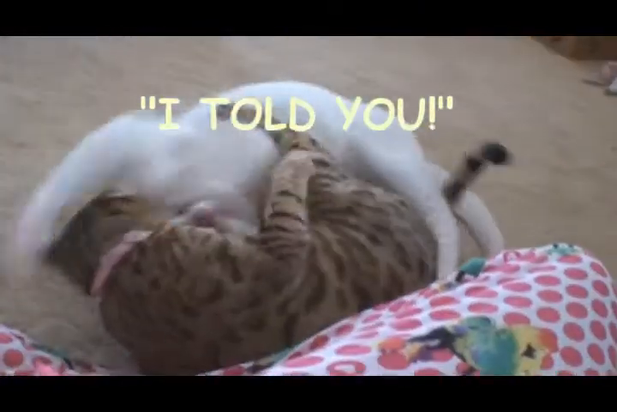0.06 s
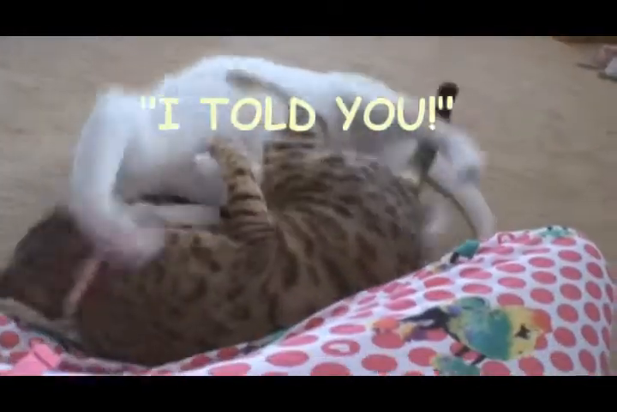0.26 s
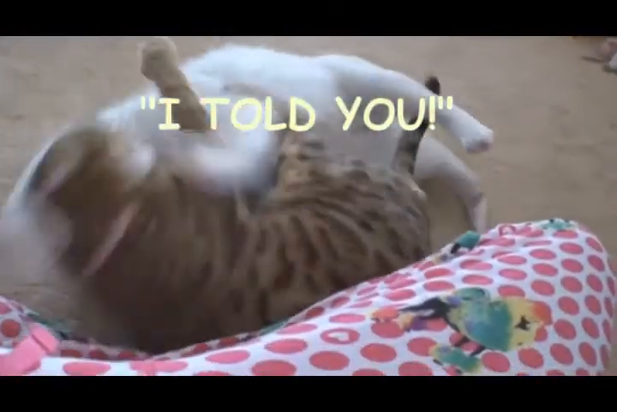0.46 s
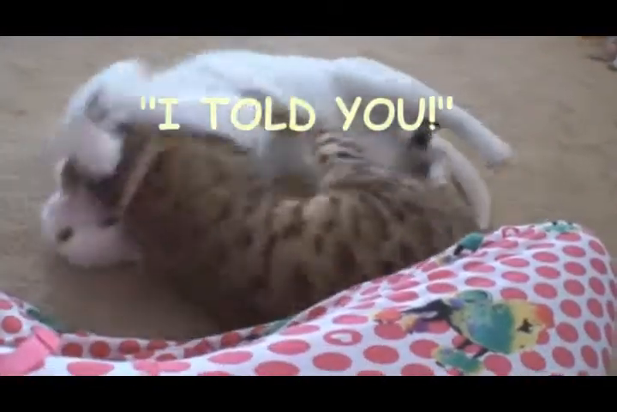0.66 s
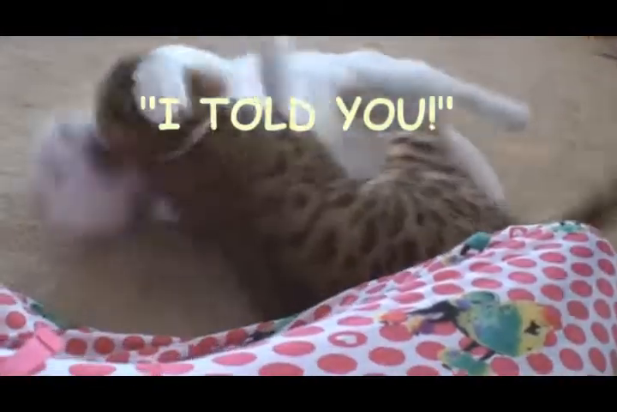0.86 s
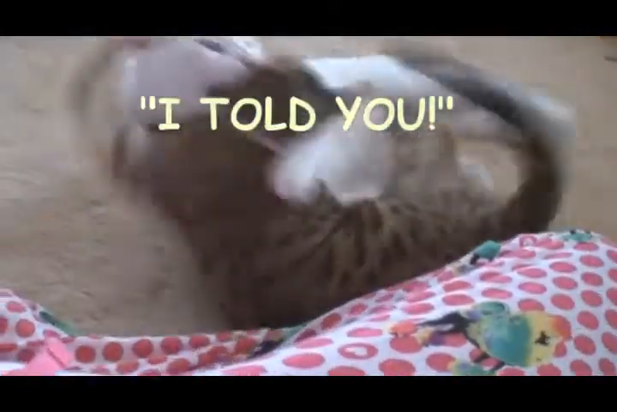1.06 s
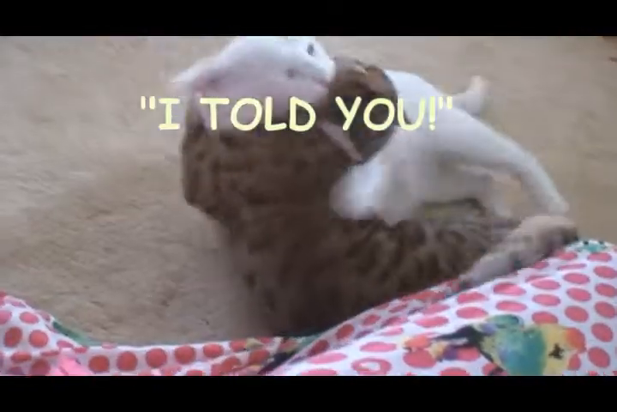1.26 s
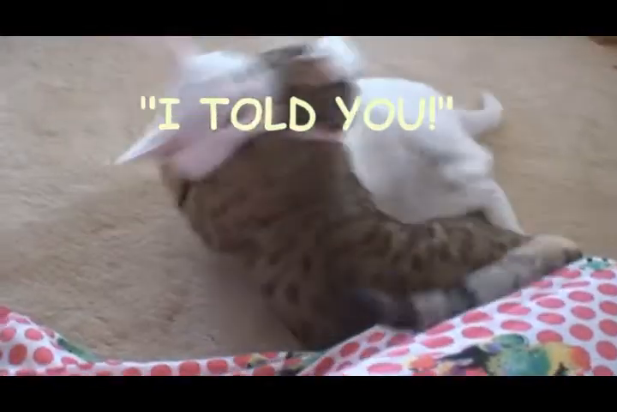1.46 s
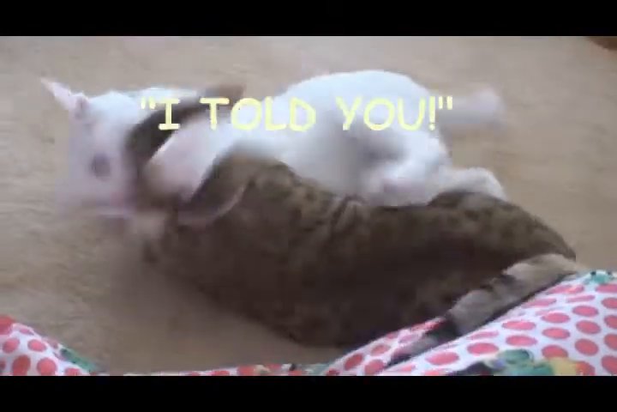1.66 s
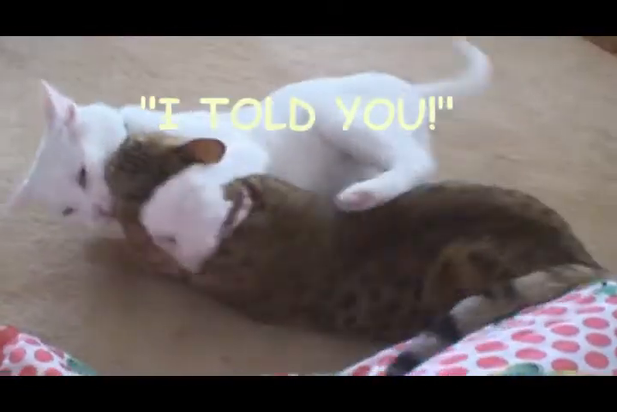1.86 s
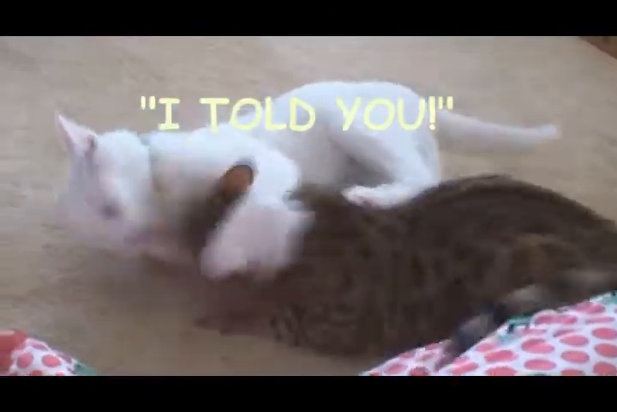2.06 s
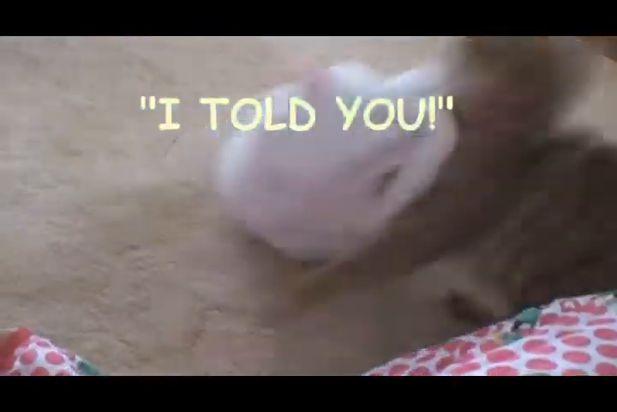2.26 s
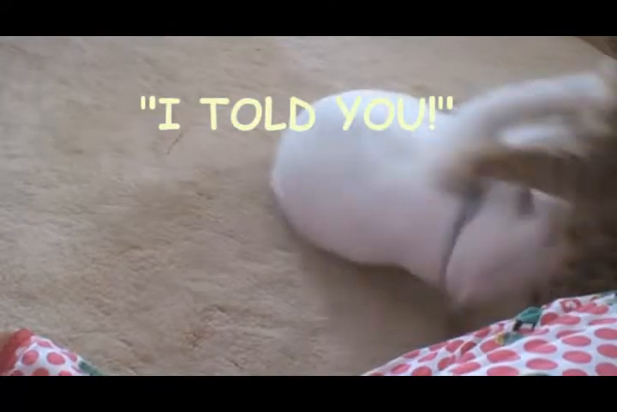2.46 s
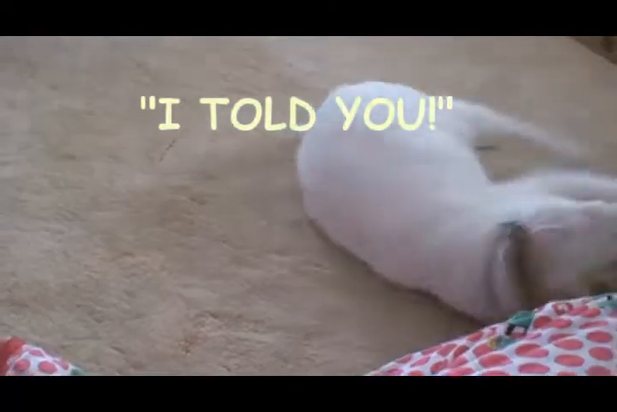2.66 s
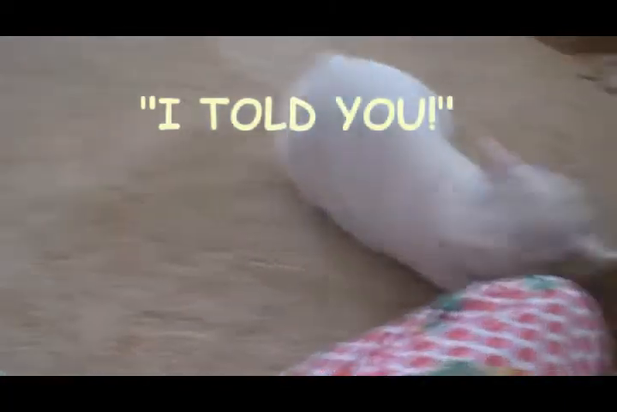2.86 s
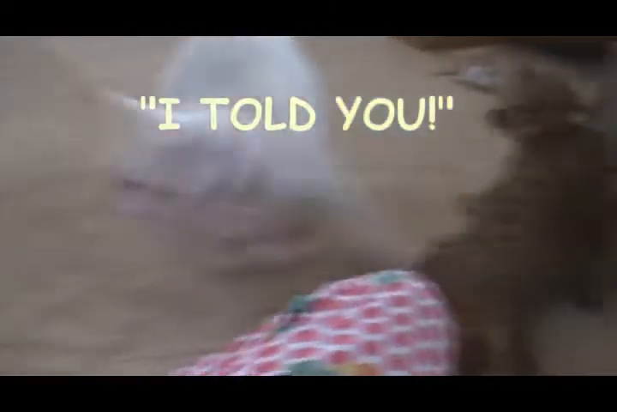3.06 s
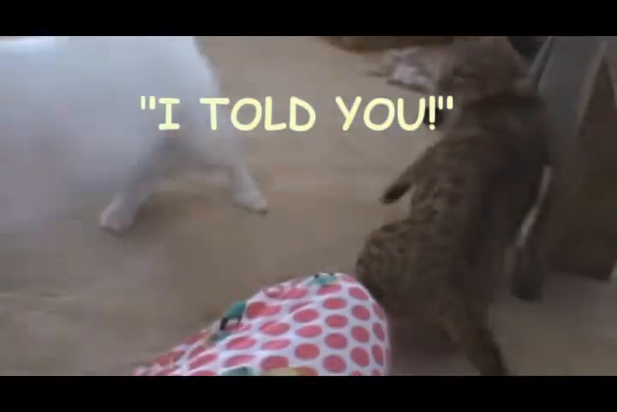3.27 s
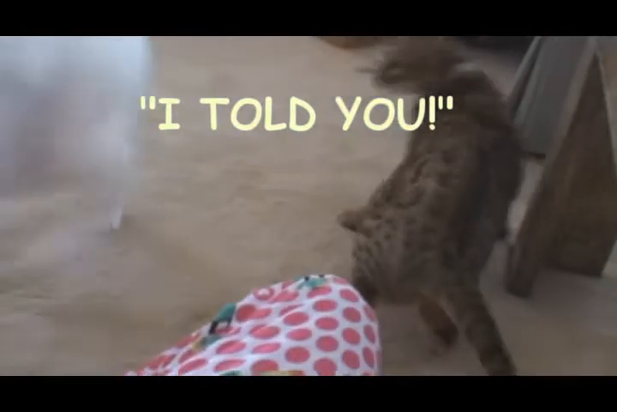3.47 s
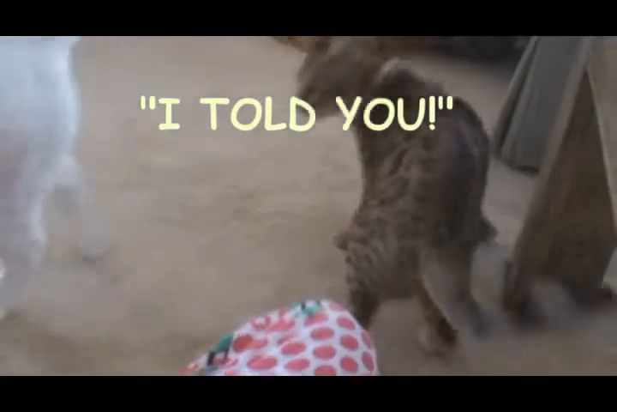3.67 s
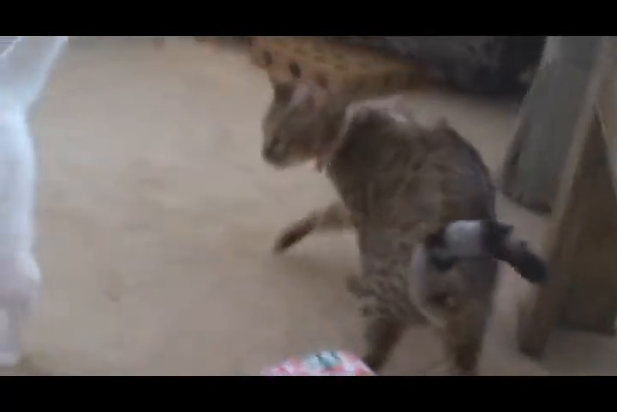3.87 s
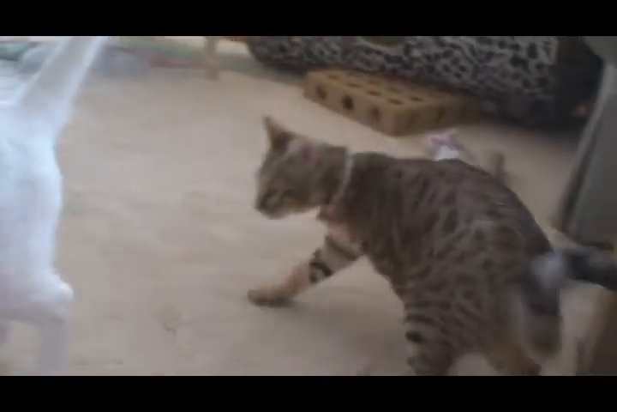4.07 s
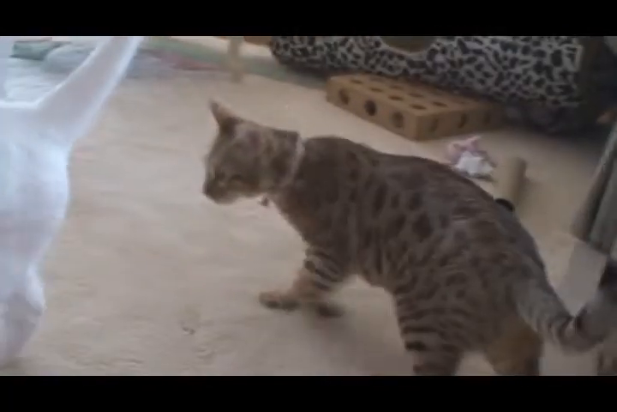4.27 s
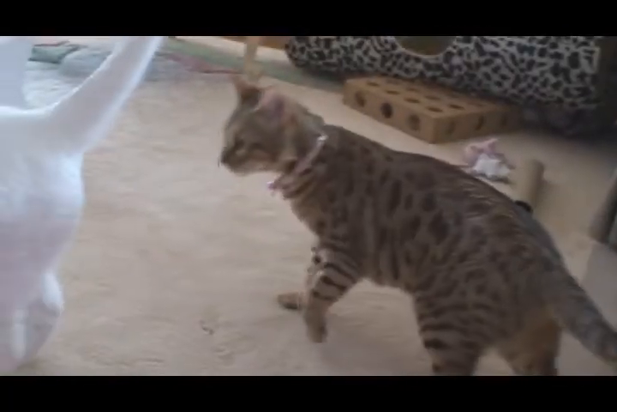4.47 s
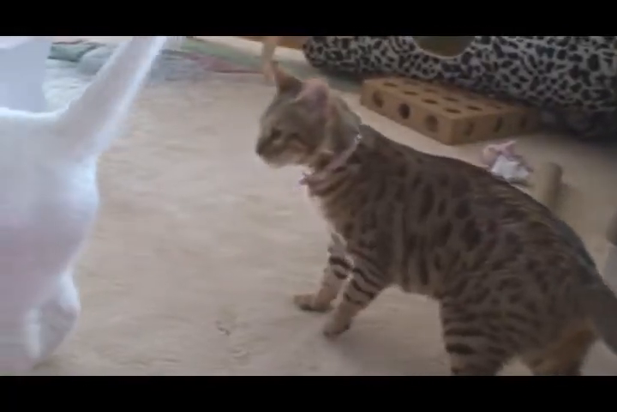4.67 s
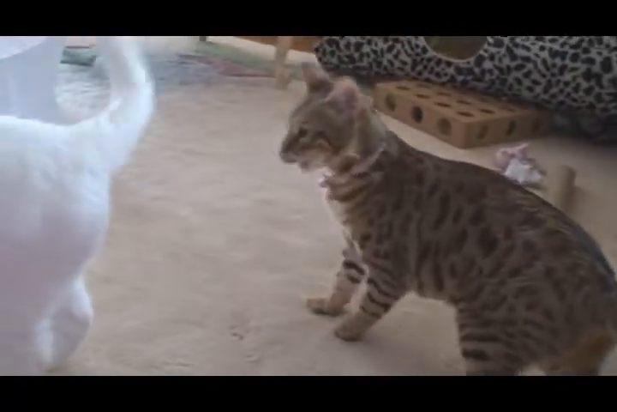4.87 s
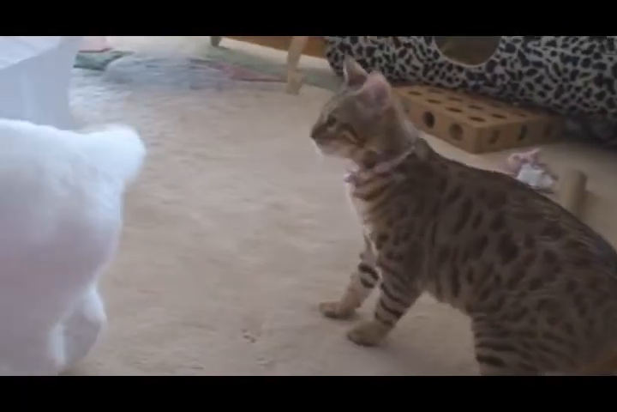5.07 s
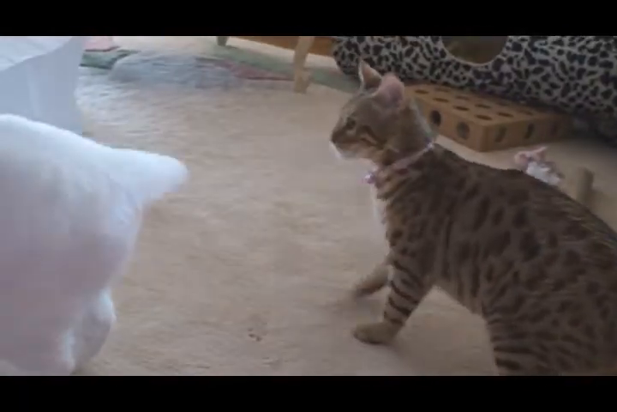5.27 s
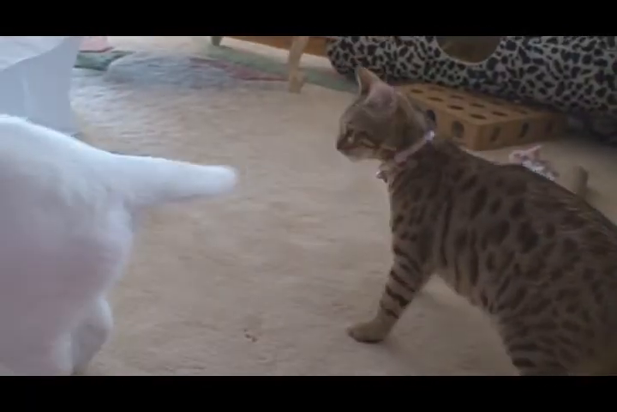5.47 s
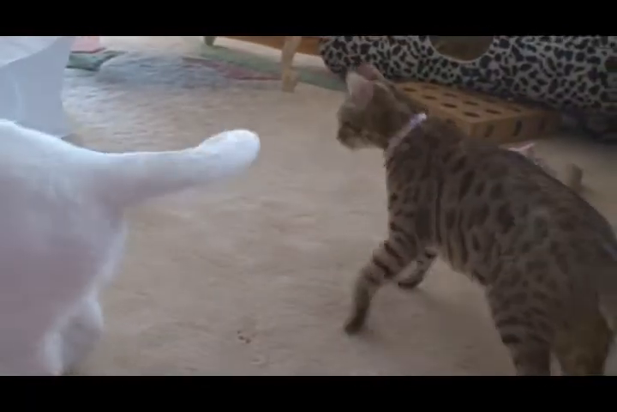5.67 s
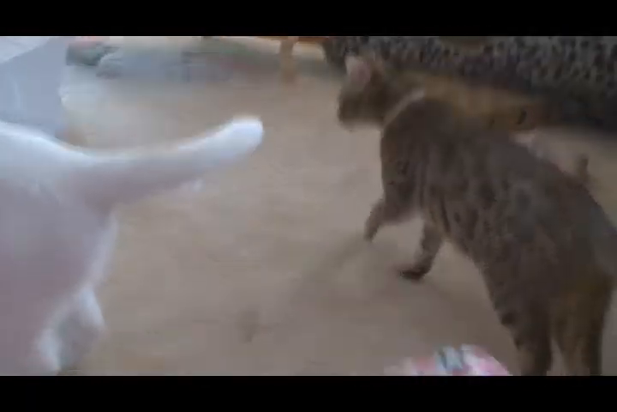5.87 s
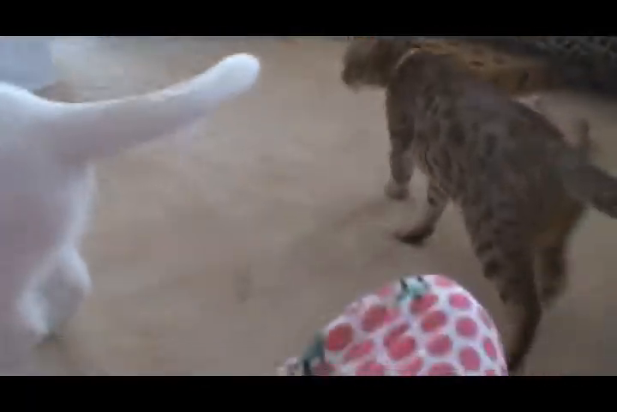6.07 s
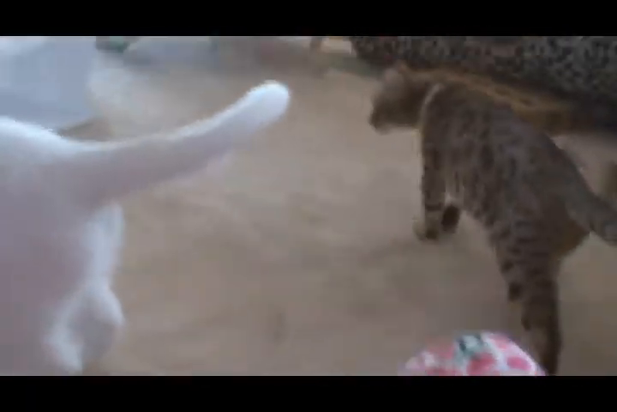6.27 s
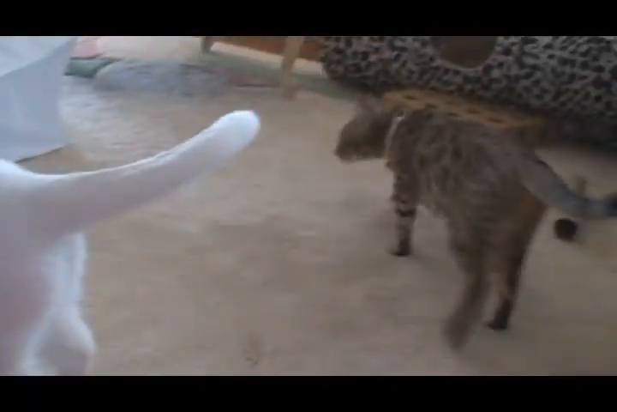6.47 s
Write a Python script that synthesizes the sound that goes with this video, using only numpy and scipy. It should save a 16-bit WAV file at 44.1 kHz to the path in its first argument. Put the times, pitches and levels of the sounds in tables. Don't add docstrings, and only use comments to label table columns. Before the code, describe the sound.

Indoors, close to a small camera, two cats wrestle on carpet. A tiny high metal bell gives faint muffled tinkles, with one sharp wooden knock early on. Mid-way it bursts into a loud, ragged jingle amid rustling fur and claw ticks, followed by a cluster of soft floor thumps. After a quiet gap with only a few dull clinks, one brief bright shake rings and dies. Hiss, low hum and thin motor tones continue underneath.

```python
import sys
import numpy as np
from scipy import signal
from scipy.fft import rfft, irfft, next_fast_len
from scipy.io import wavfile
from scipy.ndimage import uniform_filter1d

SR = 44100
rng = np.random.default_rng(int(sys.argv[2]) if len(sys.argv) > 2 else 0)


def master(y):
    cut = np.clip(np.atleast_2d(y).T, -1, 1)
    pcm = np.round(cut * 32767)
    wavfile.write(sys.argv[1], SR, pcm.astype(np.int16))


def volts_from_db(level):
    exponent = np.asarray(level, float) / 20
    return 10 ** exponent


N = 287046

# f/Hz, width/Hz, level/dB
MAIN_TONE = [(4832, 30, 0), (4890, 70, -15), (4750, 80, -18)]
# f/Hz, width/Hz, level/dB
SHELL_MODES = [(4845, 170, -5), (5150, 220, -8), (5500, 250, -9), (5940, 200, -11), (6350, 300, -23)]
# t/s, clack/dB, ring/dB, bright tick/dB, ring t60/s
FREE_BLOWS = [(0.19, -41, -41, -41.5, 0.1), (0.6005, -64, -36.5, -62, 0.23), (1.1383, -34, -57, -68, 0.41),
              (1.947, -21, -23, -49, 0.046), (2.0388, -39, -43, -74, 0.039), (2.4463, -39, -40, -56, 0.097),
              (2.4717, -15, -18, -61, 0.18), (2.5012, -14, -15.5, -68, 0.15),
              (2.612, -27, -42, -31.5, 0.19), (2.6259, -11.5, -24, -31, 0.28),
              (2.7483, -1, -19, -25.5, 0.13), (2.7781, -13, -25, -39, 0.14),
              (2.835, -17, -27.5, -38.5, 0.33), (3.2044, -17, -26.5, -54, 0.1),
              (3.3866, -15.5, -28.5, -31.5, 0.32), (3.4685, -18, -20.5, -46, 0.15),
              (5.3852, -34, -32, -55, 0.52), (5.4234, -32, -32.5, -60, 0.27), (5.472, -45, -30, -71, 0.07),
              (5.497, -14, -30, -41, 0.1), (5.5274, -4.5, -25, -33.5, 0.48), (5.5732, -13, -19.5, -49, 0.8),
              (5.685, -24, -47, -60, 0.072), (5.7204, -11.5, -20, -42.5, 0.036)]
# t/s, ring/dB, t60/s
SOFT_BLOWS = [(0.184, -43, .3), (0.4352, -41, .04), (2.758, -19, .04), (2.7745, -22, .04),
              (2.7877, -28, 0.045), (5.538, -24, 0.069), (5.594, -29, .05), (0.371, -45, .05),
              (0.385, -42, 0.065), (0.637, -48, .3), (0.661, -52, .3), (1.962, -36.5, 0.87),
              (2.003, -41.5, .8), (2.874, -36.5, 0.22), (2.964, -48, 0.18), (3.0502, -43, 0.13),
              (3.4647, -31, .2), (3.484, -43, .3), (5.562, -25, .5), (5.6032, -25.5, 0.11),
              (5.6451, -29, 0.078), (5.7395, -37, 0.036), (5.8013, -40, 0.072), (5.845, -38, 0.26),
              (5.868, -38, 0.1)]
GRAB_S = 0.002


def evened(x):
    return x / np.sqrt(np.mean(x ** 2) + 1e-20)


def read(points, hz):
    f, value = np.transpose(points)
    return np.interp(np.log(hz + 1), np.log(f + 1), value)


def add(mix, s, sound, pan_db):
    left = volts_from_db(pan_db)
    gains = [2 * left / (1 + left), 2 / (1 + left)]
    part = mix[:, round(s * SR):][:, :len(sound)]
    part += np.outer(gains, sound)[:, :part.shape[1]]


def resonate(x, hz, width):
    turn = np.exp(2j * np.pi * np.cumsum(hz * np.ones(len(x))) / SR)
    r = np.exp(-np.pi * width / SR)
    return 2 * (turn * signal.lfilter([1 - r], [1, -r], x / turn)).real


def ring(hz, t60, rise_s, turn=np.zeros(1)):
    t = np.arange(int(SR * min(t60, 0.4))) / SR
    sine = np.sin(2 * np.pi * (hz * t + turn[:len(t)]))
    return sine * volts_from_db(-60 * t / t60) * (1 - np.exp(-t / rise_s))


def colour(x, points):
    size = next_fast_len(len(x))
    gain = volts_from_db(read(points, np.fft.rfftfreq(size, 1 / SR)))
    return irfft(rfft(x, size) * gain, size)[:len(x)]


def grains(per_s, spread_db):
    size = volts_from_db(spread_db * np.minimum(rng.exponential(1, N), 4))
    return size * rng.choice([-1., 1.], N) * (rng.random(N) < per_s / SR)


def snap(noise, decay_s):
    t = np.arange(len(noise)) / SR
    burst = noise * (np.exp(-t / decay_s) + 0.09 * np.exp(-t / 0.03))
    return burst / abs(burst).max()


def swells(s, hold, db, rise, fall):
    t = np.arange(0, N, 64) / SR
    power = np.zeros(len(t))
    for start, held, top_db in zip(s, hold, db):
        drop_db = rise * np.maximum(start - t, 0) + fall * np.maximum(t - start - held, 0)
        power += volts_from_db(2 * (top_db - drop_db))
    return np.interp(np.arange(N) / SR, t, np.sqrt(power))


def bell_strikes():
    touch = rng.standard_normal(N + SR)
    touch = evened(uniform_filter1d(uniform_filter1d(touch, 260), 260))
    touch_db = 1.5 * np.tanh(touch) - 0.5
    bell, ticks = pellet_strikes(touch_db)
    return through_slit(bell + rim_strikes(touch_db)) + ticks + top_tone(touch_db)


def pellet_strikes(touch_db):
    # f/Hz, level/dB
    tick_spectrum = [(2000, -30), (4000, -5), (6500, -5), (7500, 0.5), (9500, -3.5), (11200, -2),
                     (13000, -33)]
    # t/s, left-right/dB
    collar = [
        (0.0, -8.5),
        (1.4, -10),
        (2.3, -11),
        (3.05, -12.5),
        (3.3, -9),
        (3.7, -6),
        (5.38, -3.5),
        (5.53, -5),
        (5.6, -11),
    ]
    upper_lift_db, uneven_db, uneven_pitch = -3, 8, 0.15
    bell, ticks = np.zeros((2, 2, N))
    blows = pellet_blows()
    chance = rng.random((len(blows), 10))
    noises = rng.standard_normal((len(blows), 1024))
    lost_db = losses()
    leaned = np.cumsum(lean_hz()) / SR
    for (s, clack_db, ring_db, tick_db, t60), c, noise in zip(blows, chance, noises):
        pan_db = np.interp(s, *np.transpose(collar))
        start = round(s * SR)
        for (hz, width, db), u, v in zip(SHELL_MODES, c, c[5:]):
            upper = hz > SHELL_MODES[0][0]
            db = db + upper * (upper_lift_db + uneven_db * (v - 0.5))
            mode_hz = hz * (1 + (0.012 + upper * uneven_pitch) * (u - 0.5))
            clack = volts_from_db(clack_db + db) * ring(mode_hz, 2.2 / width, 0.0005)
            add(bell, s, clack, pan_db)
            bounce_s = 0.0048 + 0.002 * c[9]
            add(bell, s + bounce_s, volts_from_db(-8 - 5 * upper) * clack, pan_db)
        add(bell, s, volts_from_db(clack_db - 5) * ring(5140, 0.0068, 0.00029), pan_db)
        for hz, width, db in MAIN_TONE:
            tone = ring(hz, t60 * MAIN_TONE[0][1] / width, 0.001, leaned[start:] - leaned[start])
            tone = grabbed(fluttered(tone, touch_db[start:]), lost_db[start:])
            add(bell, s, volts_from_db(ring_db + db + 1) * tone, pan_db)
        bright = colour(np.roll(snap(noise, 0.0005), 64), tick_spectrum)
        add(ticks, s - 64 / SR, volts_from_db(tick_db + 9.5) * evened(bright) / 7, pan_db + 7.5)
    return bell, ticks


def pellet_blows():
    # t/s, clack/dB, bright tick/dB
    choked_blows = [(0.0616, -36, -48.5), (0.1347, -33, -45), (0.292, -41, -53), (0.3603, -19.5, -58),
                    (0.443, -32, -41), (0.5506, -51, -51), (0.563, -54, -40), (0.7811, -54, -62),
                    (0.85, -33.5, -47.5), (0.927, -42, -49), (1.7659, -22.5, -68), (2.1884, -44, -63),
                    (2.3502, -20.5, -66), (2.619, -12.5, -34.5), (5.511, -45, -33.5), (3.05, -29, -59),
                    (3.2723, -16.5, -49.5), (3.363, -22, -34.5), (4.388, -28, -57), (4.4345, -29, -63),
                    (4.47, -33.5, -65), (5.6448, -14, -54), (5.837, -16, -50), (5.868, -29, -66),
                    (6.033, -36, -48), (6.047, -26.5, -62), (6.0861, -32, -64)]
    # t/s, ring/dB
    glances = [
        (0.8127, -47),
        (1.754, -49),
        (1.9256, -43),
        (2.3303, -46),
        (2.5914, -55),
        (3.162, -57),
        (5.36, -49),
        (5.819, -46),
    ]
    # t/s, clack/dB
    dull_taps = [(0.0275, -33), (0.9752, -39), (1.058, -47), (1.101, -48), (1.3494, -37.5), (1.847, -41),
                 (3.035, -31), (3.5453, -40), (4.108, -41), (4.185, -46), (4.492, -40), (4.04, -47),
                 (5.6425, -25), (3.6507, -39), (3.7174, -38), (3.8324, -41), (3.8581, -42), (4.092, -35.5),
                 (4.4119, -40), (5.3183, -51), (5.3413, -48), (5.8023, -33)]
    usual_t60 = 0.14
    blows = list(FREE_BLOWS)
    blows += [(s, db, db - 30, tick_db, usual_t60) for s, db, tick_db in choked_blows]
    blows += [(s, db + 9.5, db, db - 12, usual_t60) for s, db in glances]
    blows += [(s, db, db - 33, db - 37, usual_t60) for s, db in dull_taps]
    blows += [(s, db + 7.5, db, db - 26, t60) for s, db, t60 in SOFT_BLOWS]
    return blows


def losses():
    # t/s, loss/dB
    shell_grabs = [(0.197, 5), (0.628, 10), (0.654, 12), (0.69, 8), (1.94, 12), (1.994, 18), (2.021, 21),
                   (2.484, 2), (2.497, 7), (2.5085, 4), (2.648, 4), (2.68, 8), (2.71, 8), (2.531, 15),
                   (2.753, 9), (2.762, 10), (2.858, 18), (2.868, 25), (3.212, 6), (3.222, 3), (3.282, 13),
                   (3.422, 9), (3.441, 23), (3.478, 19), (3.502, 11), (5.412, 4), (5.461, 1), (5.506, 8),
                   (5.584, 13), (5.624, 14), (5.732, 14), (5.795, 10)]
    restrike_db = 9
    restrikes = [(row[0] - GRAB_S, restrike_db) for row in FREE_BLOWS + SOFT_BLOWS]
    steps = np.zeros(N + SR)
    for s, db in shell_grabs + restrikes:
        steps[round(s * SR)] += db
    return uniform_filter1d(np.cumsum(steps), size=round(GRAB_S * SR))


def grabbed(tone, lost_db):
    return tone * volts_from_db(lost_db[0] - lost_db[:len(tone)])


def fluttered(tone, touch_db):
    begun = 1 - np.exp(-np.arange(len(tone)) / (0.012 * SR))
    return tone * volts_from_db(touch_db[:len(tone)] * begun)


def lean_hz():
    # t/s, shift/Hz
    wall_leans = [(0, 20), (0.355, 50), (0.59, 8), (0.84, 20), (1.7, 42), (1.93, 28), (1.985, 10),
                  (2.34, 60), (2.435, 0), (2.61, -45), (2.74, 5), (2.795, 45), (2.83, 8), (3.04, 28),
                  (3.19, -5), (3.24, 40), (3.38, 2), (4.0, 30), (5.36, -10), (5.415, -3), (5.52, -20),
                  (5.568, 30), (5.575, 75), (5.598, -22), (5.635, 40), (5.655, 5), (5.67, 50), (5.79, -5),
                  (5.85, 25), (6.0, 45)]
    s, hz = np.transpose(wall_leans)
    latest = np.searchsorted(s, np.arange(N + SR) / SR, side="right") - 1
    return uniform_filter1d(hz[latest], size=130)


def rim_strikes(touch_db):
    rim_hz = [4915, 5380, 5640, 6010, 6430]
    # t/s, level/dB, t60/s
    rim_rows = [
        [(1.142, -37, 0.27), (2.349, -41, 0.053), (2.41, -48, 0.05)],
        [(0.562, -46, 0.08), (0.93, -39, 0.036), (3.651, -37, 0.032)],
        [(1.058, -42, 0.04), (2.535, -37.5, 0.12), (3.272, -25, 0.034), (5.72, -8, 0.014)],
        [(0.52, -45, 0.093), (0.59, -41, 0.072), (0.66, -38, 0.11), (0.7, -54, 0.067), (0.782, -42, 0.06),
         (1.1013, -36, 0.029), (1.146, -42, 0.13), (1.846, -41.5, 0.18), (1.958, -50, 0.08),
         (2.411, -33.5, 0.035), (2.4555, -27, 0.046), (2.5646, -29, 0.038), (2.594, -27.5, 0.064),
         (2.752, -35, 0.084), (5.5734, -21, 0.063), (5.84, -35, 0.089)],
        [(0.515, -47, 0.063), (0.6444, -40, 0.082), (0.668, -39, 0.23), (0.78, -50, 0.05), (1.853, -47, 0.11),
         (2.8794, -37, 0.065)],
    ]
    flutter = 4.2
    out = np.zeros((2, N))
    for hz, rows in zip(rim_hz, rim_rows):
        for s, db, t60 in rows:
            tone = fluttered(ring(hz, t60, 0.0033), flutter * touch_db[round(s * SR):])
            add(out, s, volts_from_db(db) * tone, -6)
    return out


def top_tone(touch_db):
    # t/s, level/dB, t60/s
    top_rows = [
        (1.946, -56, 0.04),
        (2.5017, -56, 0.05),
        (2.611, -50, 0.06),
        (5.4964, -40, 0.15),
        (5.5235, -38, 0.1),
    ]
    out = np.zeros((2, N))
    for s, db, t60 in top_rows:
        tone = fluttered(ring(11860, t60, 0.004), 5 * touch_db[round(s * SR):])
        for pan_db, late_s in ((30, 0), (-30, 1 / SR)):
            add(out, s + late_s, volts_from_db(db - 4) * tone, pan_db)
    return out


def through_slit(x):
    # low/Hz, high/Hz
    slit_hz = (4480, 7200)
    return signal.sosfilt(signal.butter(N=3, Wn=slit_hz, btype="band", fs=SR, output="sos"), x)


def pellet_rolling():
    # t/s, hold/s, rattle/dB, rolling ring/dB
    jolt_rows = [(0.0, 0.04, -55, -49), (0.194, 0.29, -63, -61.5), (0.568, 0.16, -53, -84),
                 (0.813, 0.12, -75, -57), (1.09, 0.15, -57.5, -62), (1.777, 0.21, -61, -57.5),
                 (1.956, 0.054, -63, -53), (2.342, 0.038, -50, -50.5), (2.496, 0.006, -35.5, -56),
                 (2.573, 0.1, -47.5, -59), (2.816, 0.033, -39, -59), (3.047, 0.05, -50, -50),
                 (3.218, 0.36, -55.5, -81), (4.1, 0.1, -66, -71), (4.39, 0.11, -64, -81),
                 (5.373, 0.04, -46, -52), (5.518, 0.02, -53, -42), (5.553, 0.02, -30.5, -44),
                 (5.643, 0.039, -43, -41), (5.72, 0.21, -50.5, -50.5), (6.06, 0.082, -54.5, -52.5)]
    rise_db_s, fall_db_s = 310, 214
    s, hold, rattle_db, roll_db = np.transpose(jolt_rows)
    rolls, chatter = grains(800, 1.8), grains(1100, 3.0)
    shift_hz = lean_hz()[:N]
    tone, rattle = np.zeros((2, N))
    for hz, width, db in MAIN_TONE:
        tone += volts_from_db(db) * resonate(rolls, hz + shift_hz, width) * np.sqrt(30 / width)
    for hz, width, db in SHELL_MODES[1:]:
        rattle += volts_from_db(db) * resonate(chatter, hz, width)
    rattle = through_slit(resonate(rattle, 5500, 1300))
    out = np.zeros((2, N))
    add(out, 0, swells(s, hold, roll_db, rise_db_s, fall_db_s) * evened(through_slit(tone)), -8)
    add(out, 0, swells(s, hold, rattle_db, rise_db_s, fall_db_s) * evened(rattle), -5)
    return out


def fur_dragging():
    # f/Hz, level/dB
    rustle_spectrum = [(1200, -4.5), (2500, -1), (4000, 5), (6500, 4), (9500, 0), (11200, -5.5),
                       (13000, -26)]
    # t/s, hold/s, level/dB
    drag_rows = [(0.0, 0.22, -62.5), (0.556, 0.44, -59.5), (1.095, 0.25, -62.5), (1.767, 0.2, -62),
                 (2.102, 0.21, -64.5), (2.362, 0.056, -50.5), (2.503, 0.037, -49), (2.611, 0.048, -44.5),
                 (3.03, 0.24, -56), (4.36, .05, -70), (5.352, 0.2, -53.5), (5.552, 0.053, -42.5),
                 (5.696, 0.2, -55.5), (5.994, 0.15, -60.5)]
    rise_db_s, fall_db_s = 310, 140
    rustle = np.array([evened(colour(grains(4600, 3.4), rustle_spectrum)) for port in range(2)])
    return swells(*np.transpose(drag_rows), rise_db_s, fall_db_s) * rustle * volts_from_db([[1.0], [3.0]])


def knocks():
    # t/s, level/dB, body f/Hz, t60/s, snap/dB
    knock_rows = [(0.135, -27, 1795, 0.014, -52), (0.4427, -9.5, 1700, 0.016, -43),
                  (0.4545, -22.5, 1040, 0.016, -60), (0.729, -30, 915, 0.014, -58),
                  (0.754, -35.5, 853, 0.038, -60), (1.175, -33.5, 885, 0.029, -51.5),
                  (2.512, -28.5, 1000, 0.014, -47), (2.748, -36.5, 2421, 0.054, -35),
                  (2.979, -37, 750, 0.0088, -47), (3.0164, -14, 776, 0.0039, -57),
                  (3.087, -34.5, 780, 0.033, -45.5)]
    modes = [(1.042, -1.5, 1.33), (0.854, -3.0, 1.28), (0.664, -3.0, 0.5),
             (1.176, -15.5, 1.6), (0.767, -11.5, 2.0), (2.12, -7.5, 0.52)]
    roll_over_s, before_db, after_db = 2.0, 9, -15
    out = np.zeros((2, N))
    n = np.arange(1024)
    thud_shape = np.exp(-n / 180) * np.minimum(n / 90, 1)
    noises = rng.standard_normal((len(knock_rows), 1024))
    for (s, db, hz, t60, snap_db), noise in zip(knock_rows, noises):
        pan_db = before_db if s < roll_over_s else after_db
        for ratio, mode_db, last in modes:
            add(out, s, volts_from_db(db + mode_db) * ring(hz * ratio, max(t60, 0.005) * last, 0.0016), pan_db)
        thud = resonate(resonate(noise, 0.66 * hz, 830), 0.66 * hz, 830)
        add(out, s, volts_from_db(db - 11.5) * evened(thud) * thud_shape, pan_db)
        crack = resonate(resonate(noise, 2870, 2300), 2870, 2300)
        add(out, s, volts_from_db(snap_db + 13) * snap(crack, 0.0018), pan_db)
    return out


def claws():
    # t/s, level/dB
    claw_rows = [
        (0.19, -49),
        (0.22, -50.5),
        (1.755, -56),
        (2.191, -57.5),
        (1.84, -62),
        (5.6, -49.5),
        (2.63, -40.5),
        (3.365, -52),
        (3.387, -47.5),
    ]
    out = np.zeros((2, N))
    for (s, db), noise in zip(claw_rows, rng.standard_normal((len(claw_rows), 1024))):
        add(out, s, volts_from_db(db + 22.5) * snap(resonate(noise, 2860, 2800), 0.00042), -10)
    return out


def nicks():
    # t/s, f/Hz, level/dB
    nick_rows = [(0.442, 4100, -30), (2.5935, 7500, -39), (2.5935, 9500, -42), (5.597, 2800, -42),
                 (1.86, 6700, -49), (3.0, 2320, -48), (3.022, 2210, -40), (0.4428, 5900, -35),
                 (0.441, 7160, -32), (0.4431, 1140, -16.5), (1.946, 5530, -24), (2.3553, 5200, -21),
                 (2.519, 5600, -26), (4.3892, 5560, -35), (4.435, 5460, -43), (4.471, 5440, -44),
                 (1.768, 5400, -39), (5.379, 9050, -48), (5.424, 9000, -47), (5.5, 5850, -35),
                 (5.595, 5850, -27), (5.7235, 5650, -25), (6.109, 5302, -39), (6.135, 5300, -42),
                 (0.4545, 1550, -34), (0.798, 9800, -51), (2.33, 9000, -54), (2.363, 7200, -33),
                 (2.427, 2850, -40), (2.45, 3000, -39), (2.451, 8900, -43), (2.5225, 2640, -36.5),
                 (2.612, 9300, -23), (2.621, 8900, -25), (2.638, 9160, -27), (2.756, 5940, -13.5),
                 (2.755, 9500, -25.5), (2.846, 6030, -26), (2.98, 2470, -40), (2.98, 1420, -34),
                 (3.016, 1430, -29), (3.028, 1400, -34), (3.0875, 3280, -37), (3.204, 7300, -47),
                 (3.211, 5750, -27), (3.234, 10000, -40), (3.277, 5700, -27), (3.469, 8800, -38),
                 (3.833, 3580, -44), (3.037, 1300, -40), (3.051, 1490, -45), (2.989, 1920, -44),
                 (5.546, 6140, -28), (5.5575, 6000, -30), (5.583, 5970, -26), (5.803, 6000, -36),
                 (5.641, 9700, -41), (2.7465, 5400, -34), (5.7325, 5670, -36), (5.732, 8000, -50),
                 (5.8185, 5630, -35), (5.829, 5660, -31), (5.833, 5600, -35), (5.842, 5860, -30)]
    out = np.zeros((2, N))
    for s, hz, db in nick_rows:
        add(out, s, volts_from_db(db) * ring(hz, 0.011, 0.00016), -3)
    return out


def thumps():
    # t/s, level/dB, f/Hz, t60/s, upper body/dB
    thump_rows = [(1.568, -44, 319, 0.11, -55), (2.514, -32.5, 155, 0.13, -61), (2.975, -40, 278, .05, -51),
                  (2.9786, -20.5, 299, 0.062, -26), (3.008, -27, 295, 0.088, -40),
                  (2.971, -44, 50, 0.38, -70), (2.9925, -27.5, 285, 0.13, -32),
                  (3.028, -34, 291, 0.041, -29), (3.052, -40.5, 241, 0.18, -31),
                  (5.38, -36, 149, 0.027, -57), (5.474, -38, 158, 0.067, -50)]
    out = np.zeros((2, N))
    t = np.arange(3000) / SR
    for (s, db, hz, t60, upper_db), noise in zip(thump_rows, rng.standard_normal((len(thump_rows), 3000))):
        add(out, s, volts_from_db(db) * ring(hz, t60, 0.00071), -12)
        add(out, s, volts_from_db(db - 5) * ring(0.82 * hz, 0.056, 0.0014), -14)
        for upper_hz, lift_db in ((530, -1.6), (740, -2.0)):
            add(out, s, volts_from_db(upper_db + lift_db) * ring(upper_hz, 0.06, 0.004), -6)
        scuff = evened(resonate(resonate(noise, 670, 2600), 755, 2700)) * np.exp(-t / 0.022)
        add(out, s, volts_from_db(upper_db - 12.5) * scuff, -5)
    return out


def room(x):
    # f/Hz, t60/s
    room_t60 = [(200, 0.67), (1000, 0.019), (2300, 0.14), (4200, 0.24), (5000, 0.51), (11000, 0.26)]
    taps = np.zeros((2, SR // 2))
    at = np.arange(200, SR // 2 - 20, 20) + rng.integers(0, 20, (2, (SR // 2 - 201) // 20))
    np.put_along_axis(taps, at, rng.choice([-1., 1.], at.shape), 1)
    hz, t, z = signal.stft(taps, SR, nperseg=256)
    decay = volts_from_db(-60 * t / read(room_t60, hz)[:, None])
    tail = signal.istft(z * decay, SR, nperseg=256)[1]
    return signal.fftconvolve(x, tail / np.linalg.norm(tail[0]), axes=1)[:, :N]


def air():
    # f/Hz, density/dB per Hz
    air_spectrum = [(15, -72), (25, -36), (40, -14), (60, -2), (86, -18), (108, -8), (234, -8), (266, -8),
                    (492, -12), (724, -15.5), (782, -14), (1150, -18), (1730, -21), (5650, -32.5),
                    (11600, -42), (15100, -55), (22000, -120)]
    # f/Hz, left-right/dB
    air_balance = [(60, -47), (110, -5), (200, -23), (360, -8), (650, -1), (1170, 2.5), (2120, 2),
                   (3840, -1.5), (6970, 1), (12600, -2)]
    # f/Hz, left-right correlation
    air_likeness = [(60, 0.46), (130, .3), (300, 0.091), (12000, 0.47)]
    air_db, patch_db = -46, 0.96
    frames, hz = N // 512 + 5, np.fft.rfftfreq(2048, 1 / SR)
    a, b, c, d, patches = rng.standard_normal((frames, 1025, 5)).T
    patches = evened(uniform_filter1d(uniform_filter1d(patches, 20, 0), 8, 1))
    same = read(air_likeness, hz)[:, None]
    left = volts_from_db(read(air_balance, hz))[:, None]
    right = a + 1j * b
    z = np.array([left * (same * right + np.sqrt(1 - same ** 2) * (c + 1j * d)), right])
    z *= volts_from_db(read(air_spectrum, hz)[:, None] + patch_db * patches)
    z /= np.sqrt(1 + left ** 2 + 2 * same * left)
    x = signal.istft(z, nperseg=2048, noverlap=1536)[1][:, :N]
    return volts_from_db(air_db - 3.5) * x / np.sqrt(np.mean(x.mean(0) ** 2))


def machines():
    # f/Hz, width/Hz, level/dB, left-right/dB
    hum_bands = [(58.2, 7, -54.5, -25), (116.5, 25, -60.5, -33), (238, 16, -60, -8)]
    # f/Hz, left/dB, right/dB
    motor_tones = [(700, -63, -77), (769.5, -62.5, -66), (839.8, -63.5, -68), (1680, -59.5, -90)]
    out, t = np.zeros((2, N)), np.arange(N) / SR
    for hz, width, db, pan_db in hum_bands:
        drone = resonate(resonate(rng.standard_normal(N), hz, width), hz, width)
        drone /= (abs(uniform_filter1d(drone ** 2, size=6000)) + 1e-20) ** 0.3
        add(out, 0, volts_from_db(db) * evened(drone), pan_db)
    for hz, left_db, right_db in motor_tones:
        level = np.sqrt(2) * volts_from_db([[left_db], [right_db]])
        out += level * wavered(hz * t + rng.random((2, 1)))
    return out


def wavered(turns):
    waver_db, waver_turns = 1.5, 0.07
    drift = uniform_filter1d(uniform_filter1d(rng.standard_normal((2, N)), size=2500), size=2500)
    a, b = (evened(row) for row in drift)
    return volts_from_db(waver_db * a - 1) * np.sin(2 * np.pi * (turns + waver_turns * b))


def thinned(x):
    # t/s, f/Hz
    treble_limit = [(0, 11800), (0.5, 11500), (1.4, 11600), (2.0, 11900), (2.55, 12000), (2.9, 11600),
                    (3.5, 11400), (4.1, 11550), (5.2, 11850), (5.55, 12050), (5.65, 11750), (6.5, 11550)]
    hz, t, z = signal.stft(x, SR, nperseg=2048, noverlap=1024)
    power = (abs(z[:, :1024]) ** 2).sum(0)
    bands_db = 10 * np.log10(power.reshape(128, 8, -1).sum(1) + 1e-20)
    centre = hz[4:1024:8, None]
    usual_db = np.percentile(bands_db, 25, axis=1)[:, None]
    bell_db = bands_db[24:34].max(0)
    loud_db = np.maximum(bell_db - np.median(bands_db[24:34]) - 3, 0)
    lately_db = uniform_filter1d(bands_db, size=3, axis=1)
    margin_db = np.maximum(1.9 - 0.12 * uniform_filter1d(loud_db, size=5), 0.9)
    faint = (lately_db < uniform_filter1d(lately_db, size=7, axis=0) - margin_db) & (centre > 7100)
    faint |= (bands_db < bell_db - 53 + (centre - 7000) / 500) & (centre > 7000)
    beyond = centre > np.interp(t, *np.transpose(treble_limit))
    edge = (bands_db < usual_db[65] + 9) & beyond | (centre > 12100)
    z[:, :1024] *= np.repeat(~(faint | edge), 8, axis=0)
    kept = signal.istft(z, SR, nperseg=2048, noverlap=1024)[1][:, :N]
    high = signal.butter(N=6, Wn=11900, btype="high", fs=SR, output="sos")
    tips = signal.sosfiltfilt(high, x - kept)
    tip_power = uniform_filter1d((tips ** 2).sum(0), size=128)
    sudden = tip_power > 4 * uniform_filter1d(tip_power, size=1500) + 60 * np.median(tip_power)
    return kept + 0.336 * tips * uniform_filter1d(1. * sudden, size=64)


def scene():
    bell = bell_strikes()
    bodies = knocks() + claws() + nicks() + thumps()
    wet = room(volts_from_db(-13) * bell + volts_from_db(-9) * bodies)
    return bell + bodies + pellet_rolling() + fur_dragging() + wet + air() + machines()


def top_cut(x):
    return signal.sosfilt(signal.butter(12, 13220, fs=SR, output="sos"), x)


def record(dry):
    edge = signal.firwin(255, 13000, window=("kaiser", 6), fs=SR)
    mix = thinned(signal.oaconvolve(dry, edge[None], "same"))
    return top_cut(mix)


dry = scene()
out = record(dry)
master(out)
```